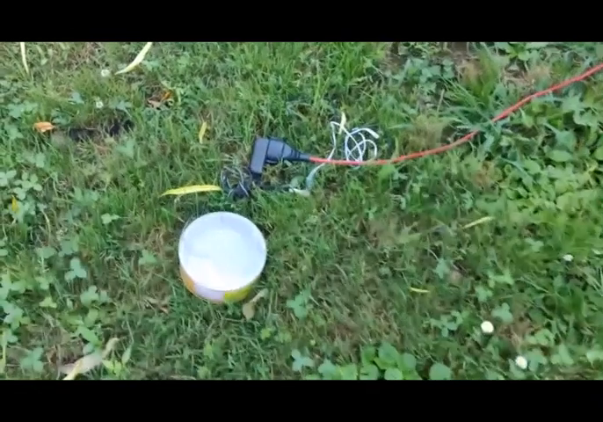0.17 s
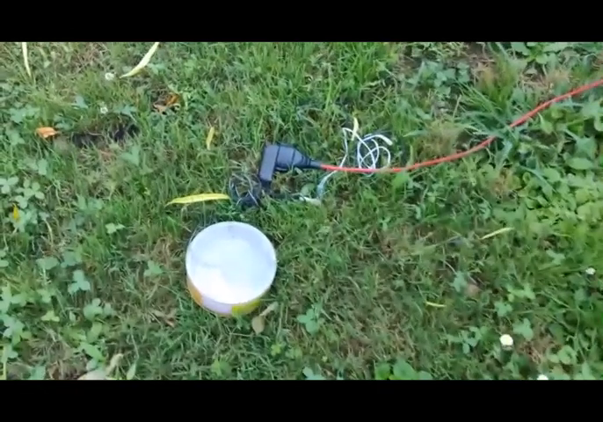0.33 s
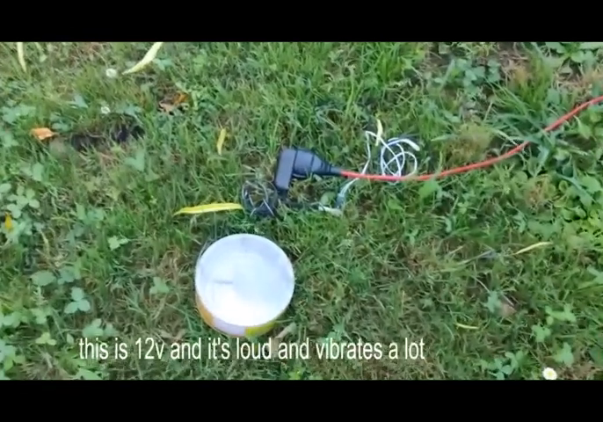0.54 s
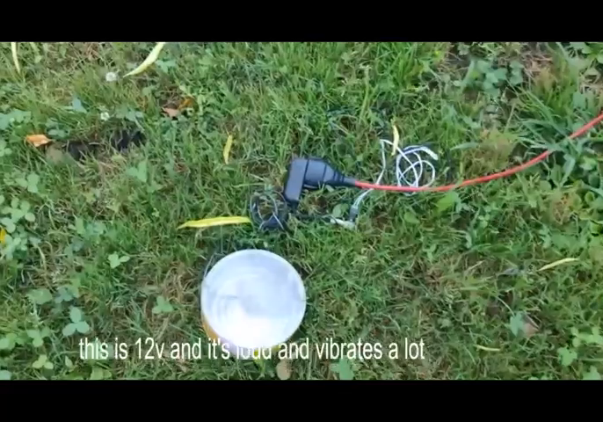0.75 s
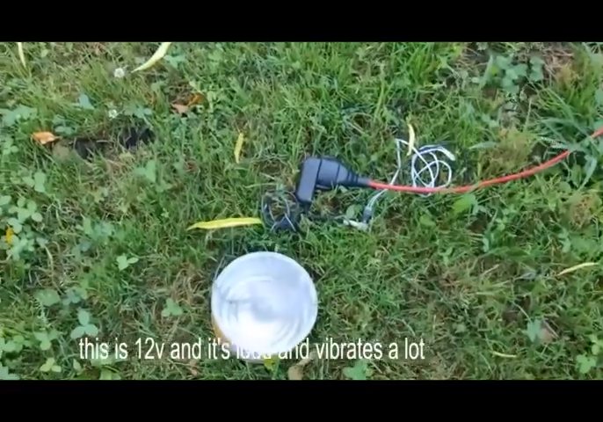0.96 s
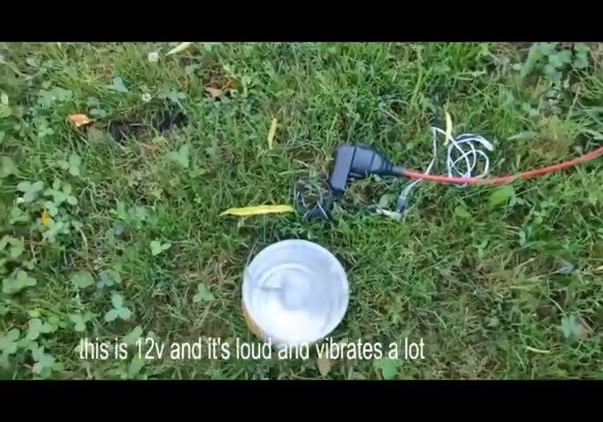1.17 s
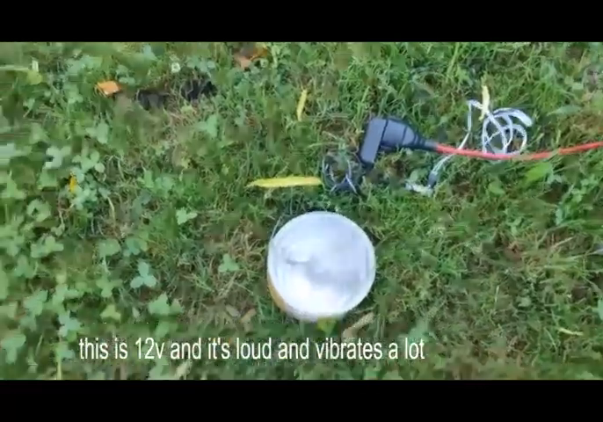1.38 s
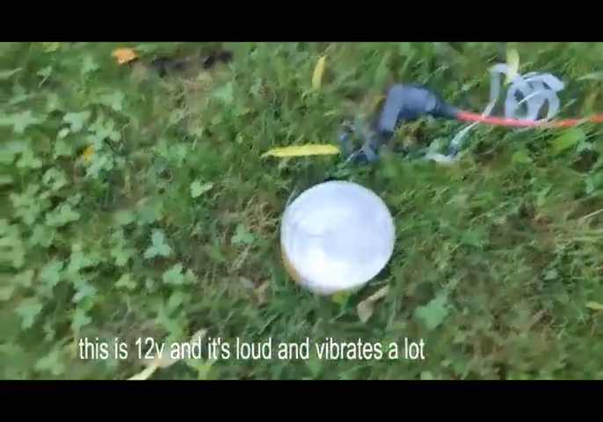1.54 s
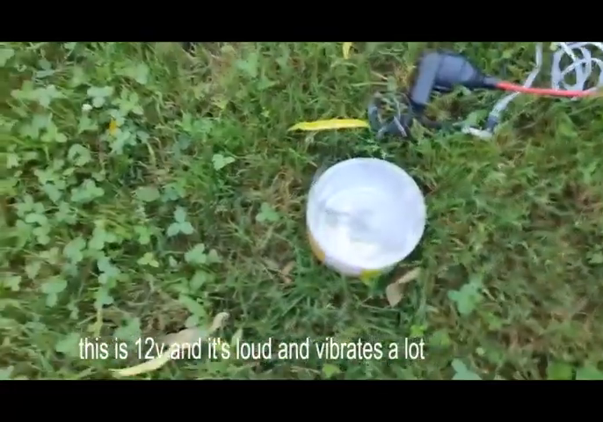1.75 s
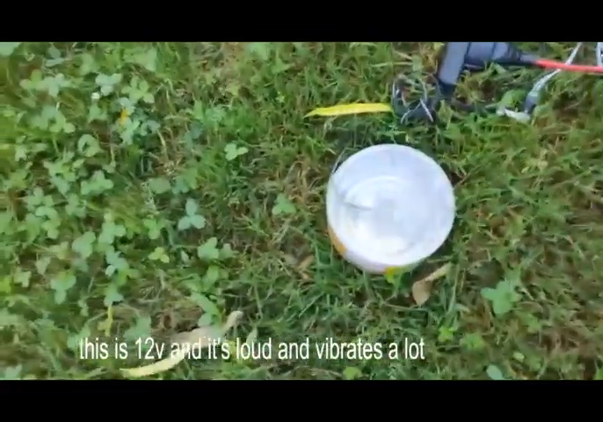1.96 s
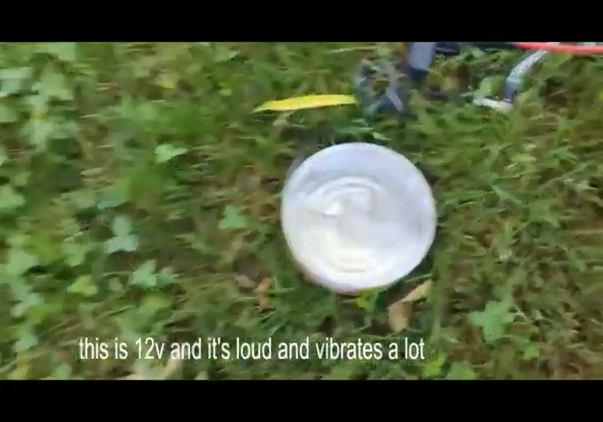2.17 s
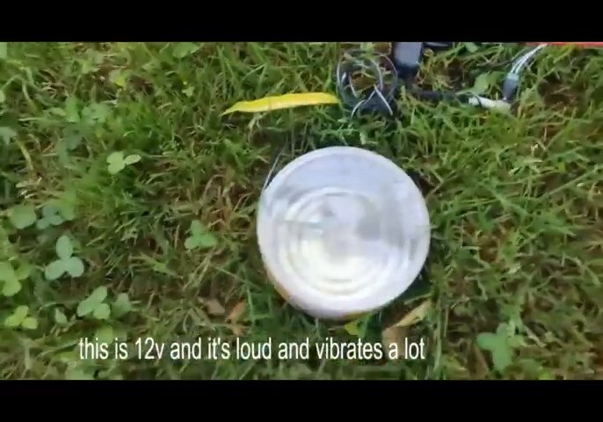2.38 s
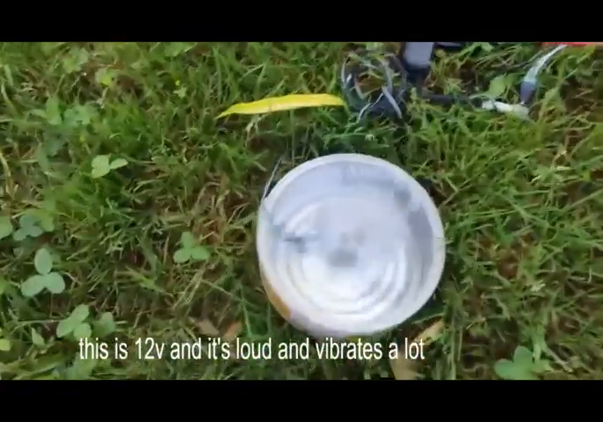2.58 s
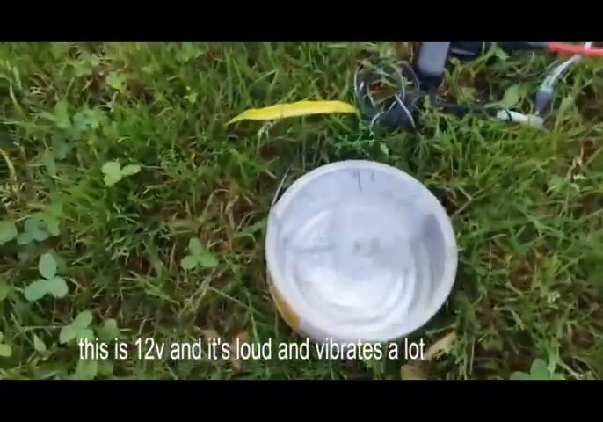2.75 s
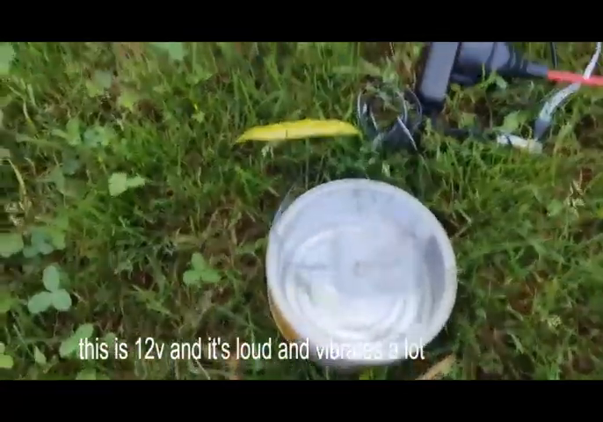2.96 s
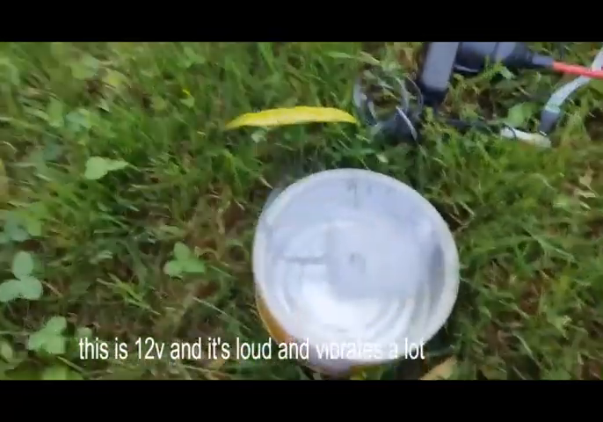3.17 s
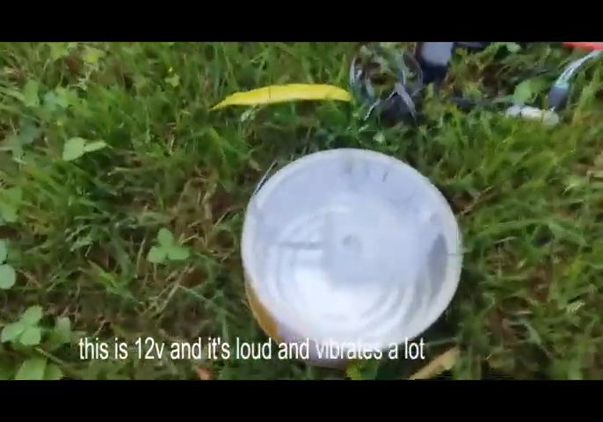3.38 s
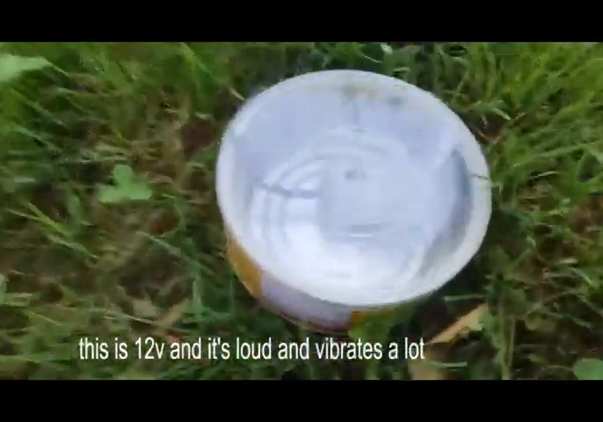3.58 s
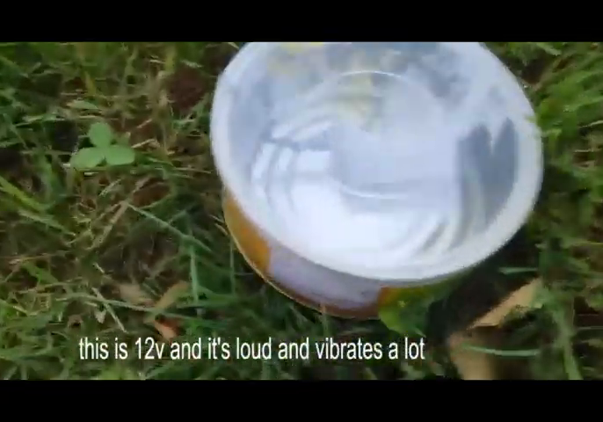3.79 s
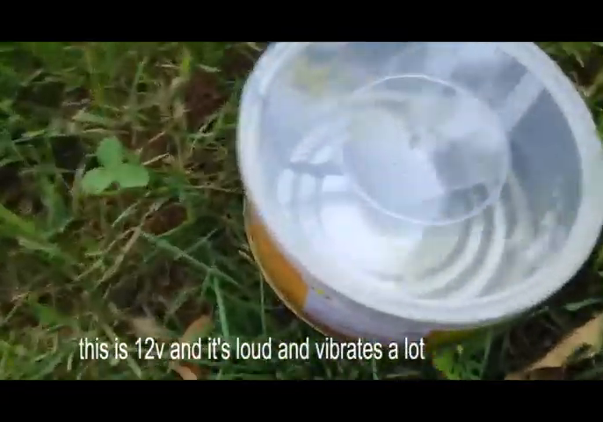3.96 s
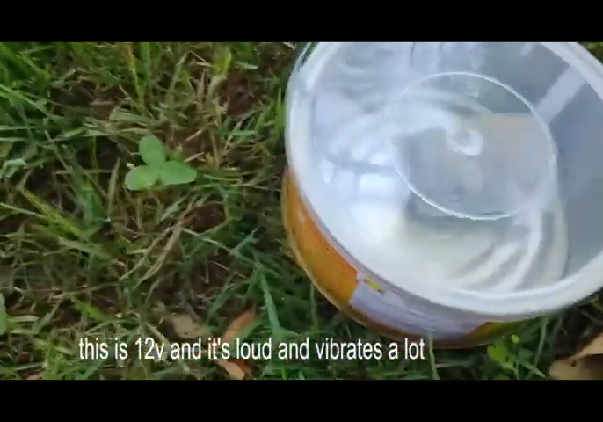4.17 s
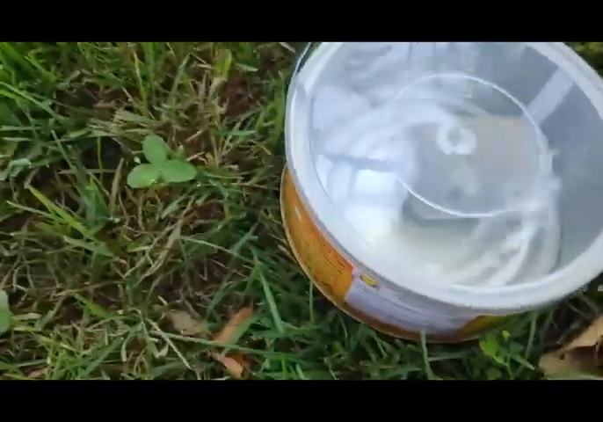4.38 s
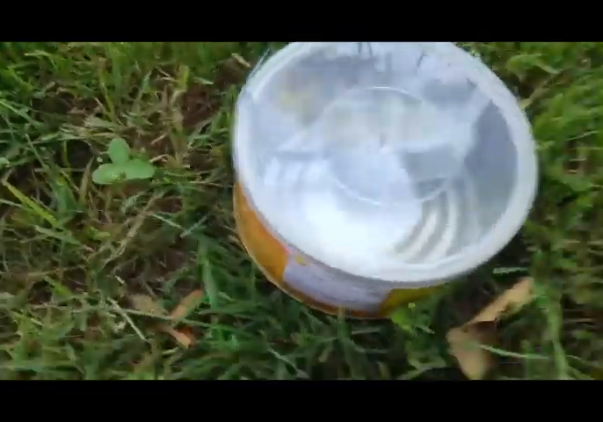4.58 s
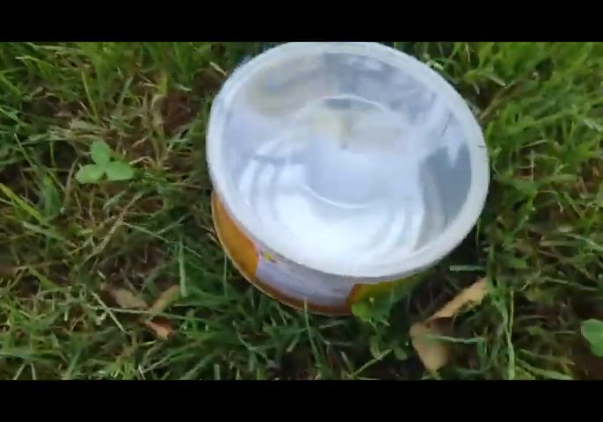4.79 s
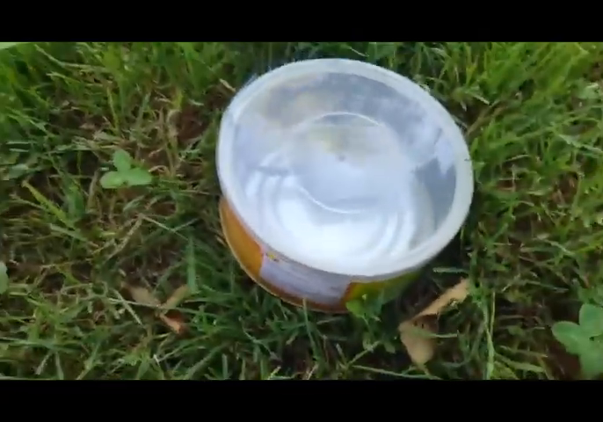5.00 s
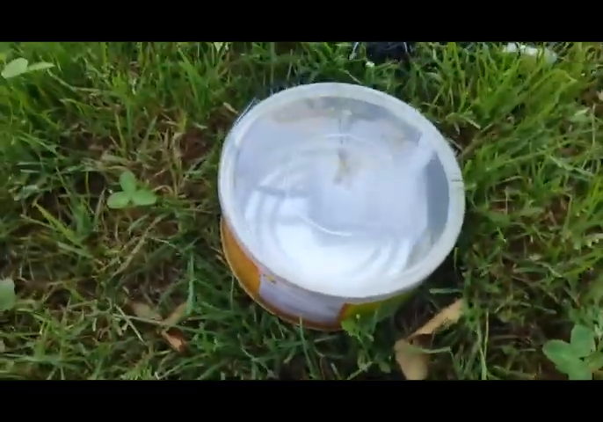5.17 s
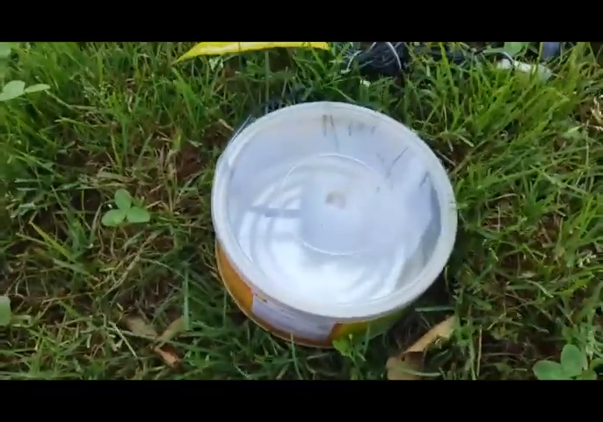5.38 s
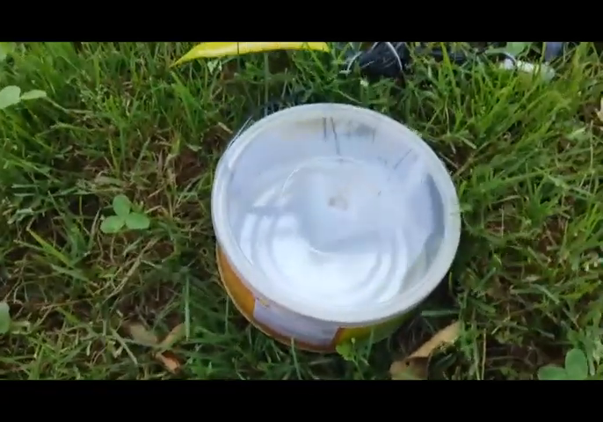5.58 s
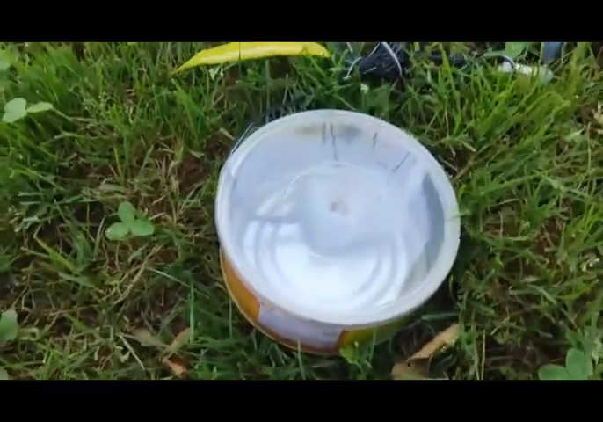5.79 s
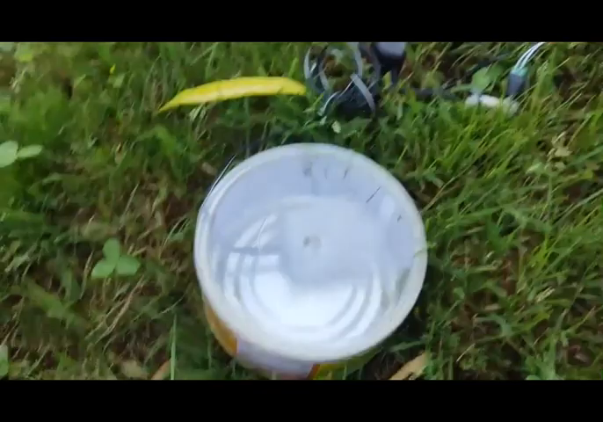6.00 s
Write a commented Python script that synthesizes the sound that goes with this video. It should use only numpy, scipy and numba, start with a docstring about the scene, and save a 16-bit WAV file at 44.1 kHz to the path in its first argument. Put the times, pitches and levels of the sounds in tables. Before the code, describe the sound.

A small vibration motor rattles rapidly inside a tin can, a loud, continuous metallic clatter with bright clinks and light wind rumble.

```python
"""An unbalanced motor hops loose inside a lidded tin can on a lawn, striking it about 26 times a second.
Each blow rings the lid, the bottom and the wall and cracks into a bright clink and a short scrape.
A hand-held phone moves closer, shifting the tone and the stereo image, while gusts of wind rumble
on its two microphone ports over a faint outdoor hush."""
import sys
import numpy as np
from scipy import signal
from scipy.fft import rfft, irfft, next_fast_len
from scipy.io import wavfile
from scipy.ndimage import uniform_filter1d, map_coordinates
from numba import njit

SR = 44100
rng = np.random.default_rng(int(sys.argv[2]) if len(sys.argv) > 2 else 0)


def digitize_waveform(pressure):
    """Quantize a signal to 16-bit integers and store it at the path in sys.argv[1].

    Rows of a 2-D input are taken as channels; values are limited to [-1, 1].
    """
    field = np.atleast_2d(pressure).T
    bounded = np.clip(field, -1, 1)
    quanta = np.round(bounded * 32767).astype(np.int16)
    wavfile.write(sys.argv[1], SR, quanta)


N = 266408

# The motor's blows. Each row: start in seconds, lid level in dB, clink level in dB.
BLOWS = [(0.002, -42, -27), (0.0322, -20, -15.5), (0.0671, -28, -16), (0.1097, -31, -26),
         (0.1245, -14.5, -22), (0.1578, -21.5, -27), (0.2012, -17, -28), (0.2199, -18, -33),
         (0.2388, -15, -22.5), (0.2734, -16, -25), (0.3132, -17, -25), (0.351, -15, -22),
         (0.3893, -15, -24), (0.4258, -14, -24), (0.4643, -14.5, -21.5), (0.5031, -19.5, -21),
         (0.5557, -18.5, -33), (0.5804, -17.5, -28), (0.6005, -16, -35), (0.6168, -14, -28),
         (0.651, -16.5, -20), (0.6914, -12, -16.5), (0.7293, -14, -29), (0.7674, -11.5, -32),
         (0.806, -12, -28), (0.845, -11.5, -30.5), (0.8831, -13.5, -31), (0.9215, -12.5, -32.5),
         (0.959, -11.5, -31), (0.9976, -12.5, -27), (1.035, -12, -25), (1.0731, -15, -21),
         (1.113, -17.5, -21), (1.1529, -12, -18), (1.1916, -15, -18), (1.2265, -18, -17.5),
         (1.2698, -15, -32), (1.2888, -17, -22), (1.3057, -11, -18), (1.342, -14.5, -29),
         (1.3827, -8.5, -22), (1.4043, -14, -21.5), (1.4222, -12.5, -26), (1.4415, -14.5, -24),
         (1.462, -16, -41), (1.4755, -16, -16), (1.5015, -22, -34), (1.5139, -10, -20.5),
         (1.554, -23, -17.5), (1.603, -42, -31), (1.6278, -14, -15), (1.6388, -12.5, -19),
         (1.6688, -17.5, -28), (1.7055, -12.5, -14.5), (1.743, -17, -16), (1.7853, -17.5, -31),
         (1.8025, -19, -15.5), (1.8227, -11.5, -30), (1.854, -20, -15.5), (1.8787, -11.5, -19.5),
         (1.9153, -12.5, -22), (1.9494, -18, -24), (1.9923, -11.5, -26), (2.008, -9.5, -16.5),
         (2.0303, -10.5, -19), (2.0644, -9.5, -22), (2.086, -12.5, -17), (2.1208, -11, -19),
         (2.143, -11.5, -13), (2.18, -8, -17), (2.2143, -14, -26), (2.2671, -30, -26), (2.289, -6.5, -17),
         (2.3332, -17, -28), (2.3471, -9.5, -23), (2.3825, -11.5, -22), (2.429, -23, -28),
         (2.4571, -7.5, -19.5), (2.5131, -14.5, -16.5), (2.5465, -38, -26), (2.5701, -12.5, -23),
         (2.611, -18, -20.5), (2.643, -24, -21), (2.6651, -18, -22.5), (2.7144, -21.5, -29),
         (2.7584, -19, -26.5), (2.798, -14, -22.5), (2.8376, -15, -21), (2.8728, -12.5, -23),
         (2.9128, -15.5, -25.5), (2.9524, -13.5, -22), (2.9867, -14, -23), (3.0247, -17, -15),
         (3.064, -16.5, -24), (3.1006, -19, -18.5), (3.1397, -15.5, -19.5), (3.1775, -15.5, -19.5),
         (3.2116, -14, -21), (3.2497, -18.0, -24), (3.288, -15, -20), (3.3274, -17.5, -23),
         (3.3492, -27, -25), (3.3637, -17, -15.5), (3.4001, -15, -21.5), (3.439, -8.5, -14),
         (3.4773, -12.5, -19.5), (3.4971, -11.5, -22), (3.515, -10.5, -27), (3.5473, -12, -21.5),
         (3.5844, -11, -18), (3.6223, -9, -16.5), (3.675, -10.5, -21), (3.7015, -8, -32),
         (3.719, -11, -12.5), (3.747, -17, -21), (3.7695, -5, -23), (3.8082, -7, -11.5), (3.8416, -12, -27),
         (3.8685, -13.5, -33), (3.8845, -5, -20.5), (3.9202, -9.5, -19), (3.9591, -10, -21),
         (3.9955, -8.5, -9), (4.0333, -6, -17.5), (4.0718, -7, -12.5), (4.1073, -7.5, -12.5),
         (4.147, -10.5, -7), (4.1855, -11.5, -13), (4.2245, -4.5, -9), (4.2545, -13.5, -15.5),
         (4.2936, -13.5, -37), (4.3474, -6.5, -15.5), (4.383, -9.5, -29), (4.426, -6.5, -21.5),
         (4.4463, -6.5, -13.5), (4.4617, -9, -42), (4.4968, -9, -7), (4.534, -10.5, -36),
         (4.57, -16.5, -14), (4.614, -8, -23), (4.6305, -11, -22), (4.6521, -11, -16), (4.6697, -16, -19.5),
         (4.6989, -9, -12), (4.7244, -16, -33), (4.7544, -11.5, -21), (4.7925, -17, -20.5),
         (4.834, -9.5, -18.5), (4.866, -11.5, -21), (4.9041, -15, -13.5), (4.9289, -14, -56),
         (4.938, -10.5, -13.5), (4.947, -15.5, -60), (4.9794, -11.5, -18), (5.0191, -14, -18.5),
         (5.0599, -13, -19.5), (5.0785, -18, -62), (5.0942, -11.5, -14), (5.1319, -17, -12.5),
         (5.1705, -16, -24), (5.2032, -20.5, -18.5), (5.2424, -30, -14), (5.296, -21.5, -23.5),
         (5.3234, -28, -31), (5.3349, -17, -26.5), (5.387, -19, -21), (5.4132, -14.5, -15),
         (5.443, -13, -16), (5.4675, -15, -32), (5.5, -13, -11.5), (5.5362, -20, -33), (5.5778, -11.5, -22),
         (5.6111, -11, -14), (5.6505, -11, -17.5), (5.694, -15, -54), (5.7056, -19, -16.5),
         (5.742, -15, -13), (5.7767, -17, -18), (5.816, -14, -17.5), (5.86, -18.5, -20), (5.8724, -13, -23),
         (5.9088, -14.5, -20), (5.958, -42, -18), (5.9849, -17.5, -22), (6.02, -26, -10.5)]
BLOW_S, LID_DB, CLINK_DB = np.transpose(BLOWS)
BLOW_SAMPLES = (BLOW_S * SR).astype(np.int64)
# The clink's colour, the dense high modes of thin sheet. Each row: frequency in Hz, density in dB.
CLINK_COLOUR = [(180, -1.5), (500, 10), (1500, 5), (2600, -25), (3400, -14), (4830, -17), (6000, -4.5),
                (6600, -10.5), (7200, -1.5), (7950, 0), (8800, 10), (10200, 4.5), (11200, 6), (12400, -39),
                (15700, -56)]


def can():
    """The motor's blows ring every part of the can: a low, hollow body under a bright, scratchy top."""
    wall_db, bottom_db, seam_db = body_blows()
    skips = chatter(t60=0.073, burst_db=4.5)
    body = lid(skips) + cavity(bottom_db, skips) + bottom(bottom_db, skips)
    body += wall(wall_db, skips) + rim()
    bright = seam(seam_db, skips)
    bright += scrape((wall_db + CLINK_DB) / 2 - 16.5, tail_s=0.13, grit_db=5.5, hurry_db=3.5)
    bright += clink(CLINK_DB + 0.5, crack_db=-15.5, tail_db=-24.5, tail_s=0.08, chatter_db=3.5)
    bright += sheet(skips, count=26, t60=0.014) + ping(skips)
    bright = sizzle(bright, hiss_db=-32.5, hiss_s=0.14, patchy_db=4.5)
    body += rattle(wall_db - 11.5, tail_s=0.092, grit_db=1.0)
    return place(body, bright)


def body_blows():
    """Wall, bottom and seam dB per blow: softer after a short hop; a keen clink misses the bottom."""
    # The body grows as the phone nears its side. Each row: time in seconds, wall, bottom and seam in dB.
    presence = [(0, -17, -28, -29), (1, -15.5, -27.5, -24), (1.5, -19, -25, -33), (2.1, -24.5, -21.5, -0.5),
                (2.7, -11.5, -19.5, -6.5), (3.4, -15, -18, -5), (3.9, -19.5, -21.5, -9),
                (4.7, -12, -19.5, -11), (5.4, -14, -19.5, -7.5), (6.04, -11.5, -18.5, -6)]
    times, *levels = np.transpose(presence)
    wall_db, bottom_db, seam_db = (np.interp(BLOW_S, times, db) for db in levels)
    full_hop_s = 0.093
    shortfall = np.clip(1 - np.diff(BLOW_S, prepend=-full_hop_s) / full_hop_s, 0, 1)
    landing_db = -9.5 * shortfall + 1.5 * rng.standard_normal(len(BLOWS))  # the struck spot varies
    wall_db += landing_db + 0.45 * (LID_DB - LID_DB.mean())
    bottom_db += landing_db - 0.087 * (CLINK_DB - CLINK_DB.mean())
    return wall_db, bottom_db, wall_db + seam_db


def chatter(t60, burst_db):
    """After a blow the motor skips on the sheet: bursty noise, partly different for each port."""
    mid, side = rng.standard_normal((2, N))
    return fade(0, t60) * undb(burst_db * walk(350)) * (mid + .5 * side * np.array([[1], [-1]]))


def lid(skips):
    """The lid's low clonk, with overtones that come out when the phone is close."""
    # Lid modes. Each row: pitch in Hz, level in dB, t60 in seconds, pan in dB, left lead in radians.
    low_modes = [(409.8, -2.5, 0.037, -5, 0.031), (450.4, 7, 0.054, -1, 0.0029), (468, 1, 0.024, 4, 0)]
    upper_modes = [(537, -8.5, 0.037, -1, 0), (803, -18.5, 0.078, 1.5, 0), (1226, -27, 0.075, 9, 0)]
    # The overtones' fader. Each row: time in seconds, level in dB.
    fader = [(0, -15), (2, -5), (2.5, -13), (3, -28), (3.5, 5.5), (3.9, -1.5), (4.3, -4), (4.7, -6.5),
             (5.3, 6.5), (6.04, -2)]
    clonk = strike(low_modes, LID_DB + 0.5, 0.00074 * skips,
                   scatter_db=1.0, detune=0.0032, spread=0.1, carry=0.19, swing=-2.884)
    overtones = strike(upper_modes, LID_DB, 0.0046 * skips,
                       scatter_db=5.5, detune=0.014, spread=0.24, carry=0.3)
    return clonk + undb(curve(fader)) * overtones


def cavity(blow_db, skips):
    """The air in the can sounds a hollow note."""
    # Air modes. Each row: pitch in Hz, level in dB, t60 in seconds, pan in dB, left lead in radians.
    modes = [(376, -0.5, 0.058, -3, 0.025), (638, -7.5, 0.021, 5, 0.19)]
    # The note's fader. Each row: time in seconds, level in dB.
    fader = [(0, 3.5), (1.9, -0.5), (2.4, -8), (2.75, 11.5), (3.3, 7.5), (3.6, -2), (4.2, 0.5), (6.04, 2)]
    return undb(curve(fader)) * strike(modes, blow_db + 3.5, 0.027 * skips,
                                       scatter_db=2.0, detune=0.018, spread=0.14, carry=0.17)


def bottom(blow_db, skips):
    """The bottom drums out the can's deepest notes."""
    # Bottom modes. Each row: pitch in Hz, level in dB, t60 in seconds, pan in dB, left lead in radians.
    modes = [(235.4, -2.5, 0.12, 0, 0), (310.7, 3, 0.033, 0.11, 0), (583, -7, 0.078, 0, 0.14),
             (835, -11.5, 0.079, 0.21, 0.0073)]
    return strike(modes, blow_db + 5.5, 0.0018 * skips,
                  scatter_db=2.0, detune=0.0085, spread=0.041, carry=0.13, swing=-1.81)


def wall(blow_db, skips):
    """The wall gives a short clank and a clear ring that fades while the phone is over the lid."""
    # Wall modes. Each row: pitch in Hz, level in dB, t60 in seconds, pan in dB, left lead in radians.
    ring_modes = [(1039, -1, 0.085, 0.95, 0.082), (1055, -4, 0.07, 0.95, 0.082)]
    clank_modes = [(1228, -4.5, 0.044, -6, -1.7), (1471, -1, 0.019, -13, 1), (1750, -15, 0.011, -11, -2.2)]
    # The ring's fader. Each row: time in seconds, level in dB.
    fader = [(0, -8.5), (.55, -3.5), (1.1, -5), (1.3, -4.5), (1.6, -1), (2, 5), (2.4, -1), (2.75, -2.5),
             (3.2, 0), (3.7, -1), (4.1, -6), (4.4, -6.5), (4.8, -3.5), (5.2, -3), (5.6, -4.5), (6.04, -2.5)]
    ring = strike(ring_modes, blow_db, 0.023 * skips,
                  scatter_db=-0.8, detune=0.0016, spread=0.33, carry=0.33, swing=-0.93)
    clank = strike(clank_modes, blow_db - .6, 0.004 * skips,
                   scatter_db=-5.0, detune=0.024, spread=0.3, carry=0.51)
    return undb(curve(fader)) * ring - clank


def rim():
    """On a few blows the motor also knocks hard on the rim."""
    # Rim modes. Each row: pitch in Hz, level in dB, t60 in seconds, pan in dB, left lead in radians.
    modes = [(600, 13.5, 0.0087, 2.5, 0.11), (811, 1.5, 0.033, -3, 0.12), (880, 0, 0.033, 6, 0)]
    # Knocks, each snapped to the nearest blow. Each row: time in seconds, level in dB.
    knocks = [(0.0672, -22), (0.5028, -19), (1.1529, -18), (1.3833, -29), (1.6692, -18), (1.9493, -19),
              (2.2893, -18), (2.4566, -20), (2.799, -16), (3.439, -23), (3.6219, -20), (4.1068, -20),
              (4.1468, -19), (5.0943, -25), (5.2427, -20), (5.7764, -13), (5.8724, -17)]
    blow_db = np.full(len(BLOWS), -120.)
    for s, db in knocks:
        blow_db[np.argmin(abs(BLOW_S - s))] = db
    return strike(modes, blow_db, np.zeros((2, N)), scatter_db=1.5, detune=0.023, spread=0.12, carry=.3)


def seam(blow_db, skips):
    """The seam adds a wide, tinny ring."""
    # Seam modes. Each row: pitch in Hz, level in dB, t60 in seconds, pan in dB, left lead in radians.
    modes = [(2022, -9, 0.07, 0, 3.3), (2560, -8, 0.035, 0, 1.2), (2632, -1.5, 0.054, 0, 1.6),
             (3018, -9, 0.09, 0, 2.9)]
    return strike(modes, blow_db - 0.5, 0.029 * skips,
                  scatter_db=-1.0, detune=0.01, spread=1.4, carry=0.24)


def clink(blow_db, crack_db, tail_db, tail_s, chatter_db):
    """A tick of first contact, a crack that is keener for hard blows, then chatter against the sheet."""
    crack = fade(crack_db + 1.22 * (blow_db + 15), t60=0.022) * stereo_noise(0.79)
    tail = undb(chatter_db * walk(300)) * fade(tail_db + 0.36 * (blow_db + 13.5), tail_s)
    tick = pulses(1.15 * (blow_db + 14) - 8, tau_s=0.00058) * stereo_noise(0.75)
    return colour(tick + crack + tail * stereo_noise(0.24), CLINK_COLOUR)


def sheet(skips, count, t60):
    """Closely spaced high modes of the thin sheet shimmer in the colour of the clink."""
    pitches = np.linspace(3300, 12200, count) * (1 + .012 * rng.standard_normal(count))
    colour_hz, colour_db = np.transpose(CLINK_COLOUR)
    modes = [(hz, np.interp(np.log(hz), np.log(colour_hz), colour_db), t60, 0, 0) for hz in pitches]
    return strike(modes, CLINK_DB - 14.5, 0.035 * skips,
                  scatter_db=4.0, detune=0.02, spread=1.0, carry=0.29)


def ping(skips):
    """A few bright modes stand out of the clink."""
    # Each row: pitch in Hz, level in dB, t60 in seconds.
    modes = [(6630, -13, .03), (8720, 0, .014), (9260, -4, .014), (10200, -1, .012)]
    return strike([(*mode, 0, 0) for mode in modes], CLINK_DB - 10.5, 0.012 * skips,
                  scatter_db=3.0, detune=0.0084, spread=1.0, carry=0.3)


def scrape(blow_db, tail_s, grit_db, hurry_db):
    """Between blows the motor drags along the wall, more when the next comes early: a gritty rasp."""
    # The rasp's fader. Each row: time in seconds, level in dB.
    fader = [(0, 7), (.45, -1.5), (.8, 6.5), (1.1, 1), (2, 4), (3, 1.5), (3.7, 3), (4.3, 1.5), (5.4, -1.5),
             (6.04, -6.5)]
    # Accented drags. Each row: time of the blow in seconds, offset from the usual rasp in dB.
    drags = [(1.1916, 11.5), (2.008, -2), (2.7144, 10), (4.6305, 8), (4.6697, 8.5), (5.4132, 4.5),
             (5.443, 5)]
    drag_db = np.interp(BLOW_S, *np.transpose(fader))
    for s, db in drags:
        drag_db[np.argmin(abs(BLOW_S - s))] += db
    gap_s = np.diff(BLOW_S, append=N / SR)
    hurry = np.clip(1 - gap_s / 0.024, -.5, 1)
    envelope = undb(grit_db * walk(150)) * fade(blow_db + drag_db + hurry_db * hurry, tail_s)
    tone = [(900, -40), (1600, 1.5), (3000, 0), (4000, 1), (5200, -6.5), (6500, 1), (9000, -11),
            (13000, -36)]
    return colour(envelope * stereo_noise(0.043), tone)


def sizzle(bright, hiss_db, hiss_s, patchy_db):
    """The highest bands come and go, and a scratchy hiss hangs on after each blow."""
    # Treble faders. Each row: time in seconds, 10.4-15.5 kHz gain in dB, added top and hiss in dB.
    faders = [(0, 0, 4), (.6, -2.5, -2), (1.1, -25, 7), (1.4, -1, 7.5), (1.7, -6, 1), (2.2, 2, -2),
              (2.7, 2, 1), (3.4, -0.5, -4), (3.9, -1, -5), (4.2, 3, 0), (4.7, 0.5, 3.5), (5.2, -1.5, -11),
              (6.04, -3, -8)]
    treble_db, top_db = curve(faders)
    envelope = undb(patchy_db * walk(40)) * fade(hiss_db + 0.52 * (CLINK_DB + 17.5), hiss_s)
    hiss = envelope * stereo_noise(0.37)
    top = band(bright, 11370, 13000) + band(hiss, 7400, 13300)
    treble_change = (undb(treble_db) - 1) * band(bright, 10400, 15500)
    return bright + treble_change + undb(top_db) * pan(6) * top  # the left port faces it


def rattle(blow_db, tail_s, grit_db):
    """The loose wall buzzes on after a blow: noise in its middle resonances."""
    envelope = undb(grit_db * walk(120)) * fade(blow_db, tail_s)
    tone = [(450, -10.5), (620, 9), (900, -22), (1100, 4), (1450, -2), (1780, 3), (1900, -14),
            (2300, -11.5), (2625, -4), (2850, -8.5), (3400, -6.5), (4200, -30.5)]
    return colour(envelope * stereo_noise(1.0), tone)


def place(body, bright):
    """The can shifts in the stereo image as the phone moves; little of it sounds below about 160 Hz."""
    # The can's place in the image. Each row: time in seconds, body pan in dB, bright pan in dB.
    aim = [(0, -0.5, 0), (1.2, 0.5, -3), (2.1, 3.5, 0), (3, 0.5, 1.5), (3.6, 1.5, -0.5), (4.3, 3, -0.5),
           (5.3, 1, 0), (6.04, 1, 1)]
    # The phone tilts while closest. Each row: time in seconds, lag of the left port in milliseconds.
    tilt = [(3.35, 0), (3.6, -.18), (4.35, -.16), (4.55, 0)]
    delay_s, lowest_hz = 0.00056, 158
    (body_pan, bright_pan), (lag_ms,) = curve(aim), curve(tilt)
    out = pan(body_pan) * body + pan(bright_pan) * bright
    out[0] = map_coordinates(out[0], [np.arange(N) - lag_ms * SR / 1000], order=3, mode="nearest")
    # The can's knocks and clinks sound about half a millisecond after their listed times.
    delayed = np.roll(out, int(delay_s * SR), axis=1)
    return signal.sosfilt(signal.butter(3, lowest_hz, "high", fs=SR, output="sos"), delayed)


def strike(modes, blow_db, drive, scatter_db, detune, spread, carry, swing=np.pi):
    """Modes struck at every blow; the spot differs, so level, pitch and left-right phase vary."""
    out = np.zeros((2, N))
    chance = rng.standard_normal((len(BLOWS), len(modes), 3))
    for m, (hz, db, t60, pan_db, lead) in enumerate(modes):
        size = undb(blow_db + db + scatter_db * chance[:, m, 0])
        pitch_hz = hz * (1 + detune * chance[:, m, 1])
        pole = np.exp(2j * np.pi * pitch_hz / SR - np.log(1000) / (t60 * SR))
        for ch, side in enumerate((.5, -.5)):
            phase = swing * m + side * (lead + spread * chance[:, m, 2])  # swing: radians between modes
            ring = resonate(BLOW_SAMPLES, size * np.exp(1j * phase), pole, drive[ch], carry)
            out[ch] += undb(side * pan_db) * ring.imag
    return out


@njit
def resonate(starts, kicks, poles, drive, carry):
    """One mode: each blow damps the ring to the fraction carry, adds its kick and resets the pitch."""
    out = np.empty(len(drive), np.complex128)
    state, kick, pole, blow = 0j, 0j, 0j, 0
    for i in range(len(drive)):
        if blow < len(starts) and i == starts[blow]:
            kick, pole = kicks[blow], poles[blow]
            state = carry * state + kick
            blow += 1
        state = state * pole + kick * drive[i]
        out[i] = state
    return out


def wind():
    """Wind flutters on each port independently; the deep and the upper rumble gust separately."""
    # Gusts. Each row: time in seconds, deep rumble in dB, upper rumble in dB, pan in dB.
    gusts = [(0.0, -22, -29, -3), (0.03, -26.5, -20.5, 4), (0.3, -37, -39.5, -2), (0.34, -37, -20, 15),
             (0.39, -32, -28.5, 2.0), (0.62, -34, -37, -9), (0.65, -25, -26.5, 8), (0.84, -37, -37.5, -6),
             (0.93, -33, -36, 7), (1.08, -37, -37, -24), (1.18, -41, -36, 1), (1.24, -36, -23, 4),
             (1.29, -32, -26, 1), (1.39, -34, -22.5, 17), (1.5, -25, -25, -1), (1.7, -46, -31.5, 21.5),
             (1.8, -27.5, -28, 8), (1.85, -40, -33, 1), (2.07, -30.5, -24.5, 7), (2.39, -35, -35, -5),
             (2.44, -37, -27, 8), (2.81, -39, -46, -1), (2.99, -35, -28, 10), (3.03, -40, -40.5, 4),
             (3.58, -37.5, -38, -4), (3.7, -47, -48, -5), (4.27, -48, -43, 11), (4.31, -35, -35, -6),
             (4.41, -26, -31.5, 4), (4.46, -37, -39, -18), (4.56, -44.5, -47.5, 0), (5.6, -41, -40, -2),
             (5.68, -40, -42, 10.5), (6.04, -37, -36, -8)]
    # The rumble's colour. Each row: frequency in Hz, density in dB.
    tone = [(15, 0), (25, -4), (45, -1), (110, -1.5), (180, -6), (340, -15), (600, -33), (1200, -70),
            (3000, -90)]
    deep_db, upper_db, pan_db = curve(gusts)
    out = np.zeros((2, N))
    for ch in range(2):
        rumble = colour(rng.standard_normal(N), tone) * undb(2.1 * walk(24.53))
        deep = signal.sosfilt(signal.butter(2, 90, fs=SR, output="sos"), rumble)
        out[ch] = undb(deep_db + 9.5) * deep + undb(upper_db + 5.5) * (rumble - deep)
    return pan(pan_db) * out


def air(level_db):
    """Faint outdoor hush."""
    return undb(level_db) * colour(rng.standard_normal((2, N)), [(100, -23), (12000, -25)])


def pulses(blow_db, tau_s):
    """An envelope that jumps at every blow and decays with time constant tau_s."""
    hits = np.zeros(N)
    hits[BLOW_SAMPLES] = undb(blow_db)
    return signal.lfilter([1], [1, -np.exp(-1 / (tau_s * SR))], hits)


def fade(blow_db, t60, rise_s=0.0009):
    """An envelope that rises quickly at every blow and falls 60 dB in t60 seconds."""
    rise = np.exp(-1 / (rise_s * SR))
    return signal.lfilter([1 - rise], [1, -rise], pulses(blow_db, t60 / np.log(1000)))


def walk(rate):
    """Random levels held 1 / rate seconds and smoothed twice; spread near 1."""
    hold = int(SR / rate)
    steps = np.repeat(rng.standard_normal(N // hold + 1), hold)
    return 1.125 * uniform_filter1d(uniform_filter1d(steps, hold), hold)[:N]


def stereo_noise(likeness):
    """White noise on two ports, correlated by likeness."""
    mid, side = rng.standard_normal((2, N))
    return np.sqrt((1 + likeness) / 2) * mid + np.sqrt((1 - likeness) / 2) * side * np.array([[1], [-1]])


def colour(x, table):
    """Shape the spectrum by (Hz, dB) points; white noise keeps its rms."""
    size = next_fast_len(N + 4096)
    hz, db = np.transpose(table)
    bin_hz = np.arange(size // 2 + 1) * SR / size
    gain = undb(np.interp(np.log(bin_hz + 1), np.log(hz), db))
    return irfft(rfft(x, size) * gain / np.sqrt(np.mean(gain ** 2)), size)[..., :N]


def band(x, lo_hz, hi_hz):
    """Steep band-pass."""
    return signal.sosfilt(signal.butter(3, [lo_hz, hi_hz], "band", fs=SR, output="sos"), x)


def curve(table):
    """Columns of a (seconds, value, ..) table at every sample."""
    times, *columns = np.transpose(table)
    return [np.interp(np.arange(N) / SR, times, column) for column in columns]


def pan(db):
    """Left and right gains; a pan is left minus right in dB."""
    return undb(np.array([[.5], [-.5]]) * db)


def undb(db):
    """Decibels to gain."""
    return 10 ** (np.asarray(db) / 20)


def scene():
    """Can, wind and hush at the two ports."""
    return can() + wind() + air(level_db=-56)


def record(dry):
    """The phone rounds the loudest peaks and cuts the top."""
    ceiling, top_hz = .86, 16200
    soft = dry / (1 + (dry / ceiling) ** 4) ** .25
    return signal.sosfilt(signal.ellip(10, .2, 80, top_hz, fs=SR, output="sos"), soft)


dry = scene()
out = record(dry)
digitize_waveform(out)
```